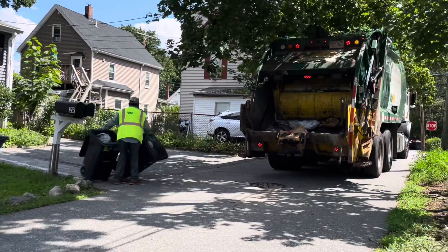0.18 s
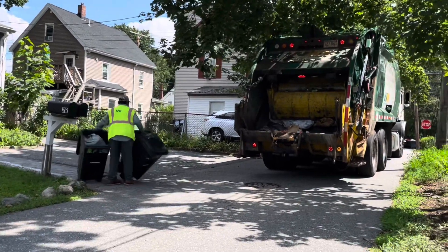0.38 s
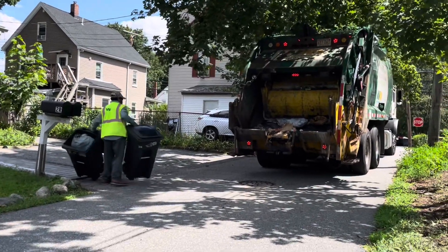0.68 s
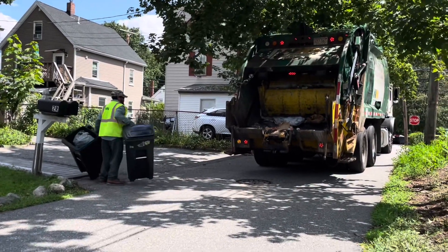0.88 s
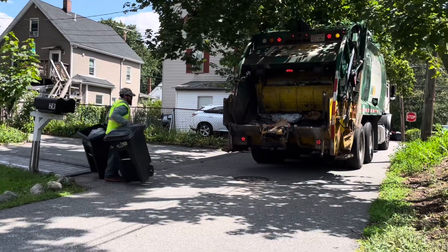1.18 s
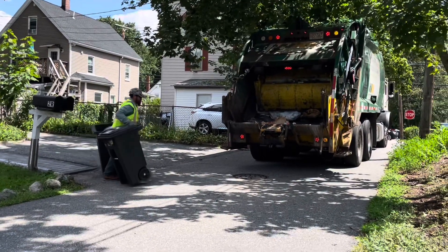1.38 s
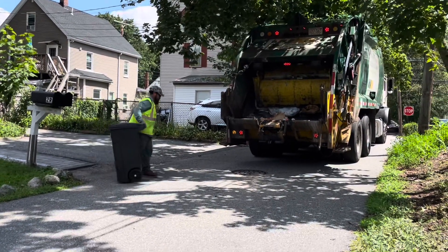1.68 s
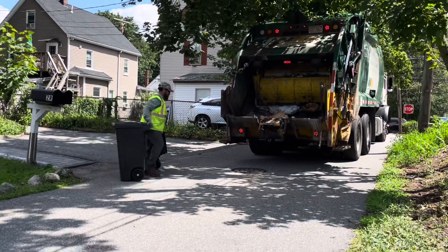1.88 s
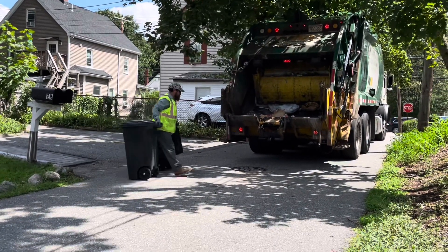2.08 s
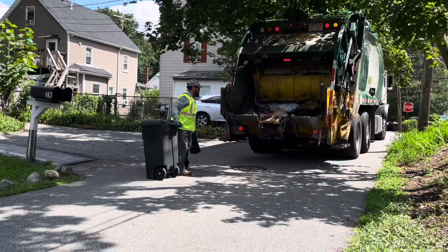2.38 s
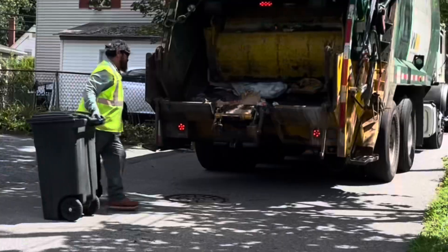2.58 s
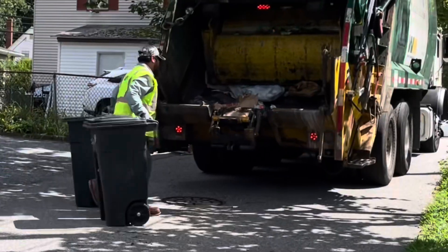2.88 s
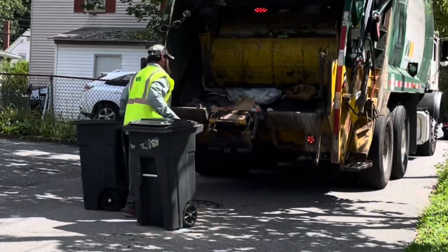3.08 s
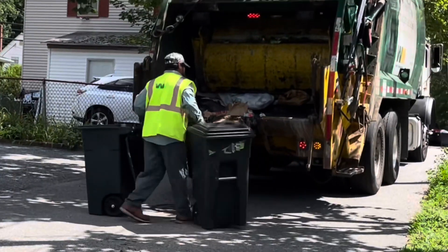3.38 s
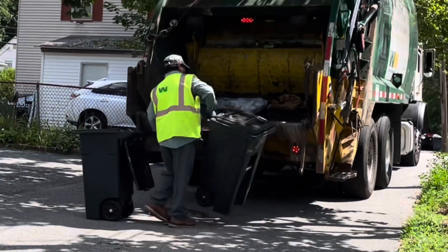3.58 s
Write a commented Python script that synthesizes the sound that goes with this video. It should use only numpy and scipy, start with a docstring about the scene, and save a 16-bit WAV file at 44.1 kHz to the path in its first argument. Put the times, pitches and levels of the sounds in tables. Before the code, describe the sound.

Plastic bins bang with deep boomy thuds, scuff briefly and rumble along the road until about three seconds, ending in sharp clatters; a garbage truck's low diesel drone and faint hydraulic hiss continue throughout, outdoors in stereo.

```python
"""A diesel garbage truck holds a fast idle on a street: summed exhaust orders, pulsing noise, pump tones.
After a lone clack, plastic wheelie bins are bumped and ring in decaying modes; one drags with gritty noise.
Pump hiss and a thin gear whine swell, more bumps boom, and the bins roll on asphalt: random impacts
drive resonances for rumble and lid chatter, while noise bursts clack ever more densely.
The rolling fades after three seconds and the truck idles on; house fronts answer bumps and clacks."""
import sys
import numpy as np
from scipy import signal
from scipy.fft import rfft, irfft, next_fast_len
from scipy.io import wavfile
from scipy.ndimage import map_coordinates

SR = 44100
rng = np.random.default_rng(int(sys.argv[2]) if len(sys.argv) > 2 else 0)


def put_to_file(sound):
    """Save the sound as 16-bit audio at rate SR, in the file named by the first command-line argument."""
    columns = np.atleast_2d(sound).T  # one column per channel
    safe = np.clip(columns, -1, 1)
    whole_steps = np.round(safe * 32767)
    wavfile.write(sys.argv[1], SR, whole_steps.astype(np.int16))


N = 165375


def amp(db):
    """Decibels to gain."""
    return 10 ** (np.asarray(db) / 20)


def unit(x):
    """Scale to rms 1."""
    return x / np.sqrt(np.mean(x ** 2) + 1e-20)


def along(points, hz):
    """Read a curve of (frequency, value) points on a log frequency axis."""
    point_hz, values = np.transpose(points)
    return np.interp(np.log(hz + 1), np.log(point_hz + 1), values)


def curves(rows):
    """One value per sample for each column after the time."""
    times_s, *columns = np.transpose(rows)
    return [np.interp(np.arange(N) / SR, times_s, column) for column in columns]


def wobble(rate):
    """A smooth random curve with rate knots a second."""
    return map_coordinates(rng.standard_normal(1024), [np.arange(N) * rate / SR], mode="mirror")


def filtered(x, response):
    """Shape the spectrum of x by a response of frequency."""
    length = x.shape[-1]
    padded = next_fast_len(length + 8192)
    spectrum = rfft(x, padded) * response(np.fft.rfftfreq(padded, 1 / SR))
    return irfft(spectrum, padded)[..., :length]


# Stereo width, side relative to mid before each layer's offset; columns: frequency_hz, side_db
STEREO_WIDTH = [(60, -23), (250, -10.5), (500, -5), (1000, -3.5), (2000, -2), (4500, -21.5), (7000, -16),
                (10000, -14)]


def coloured(x, spectrum, side_db):
    """Two unrelated signals become mid and side of one stereo sound of rms 1."""
    def response(hz):
        side_gain = amp(along(STEREO_WIDTH, hz) + side_db)
        return amp(along(spectrum, hz)) * np.array([np.ones_like(hz), side_gain])
    mid, side = filtered(x, response)
    return unit(np.array([mid + side, mid - side]))


def resonating(x, peaks):
    """Ring x through parallel band-pass resonances of alternating sign, as stereo of rms 1."""
    def body(hz):
        total = 0
        for k, (centre, width, db) in enumerate(peaks):
            band = 1j * hz * width
            total = total + (-1) ** k * amp(db) * band / (centre * centre - hz * hz + band)
        return total
    return coloured(filtered(x, body), [(25, -23), (80, 7)], side_db=-5.0)


def impacts(rate, spread_db):
    """Two trains of small clicks, rate a second on average, with random sign and strength."""
    hits = rng.random((2, N)) < rate / SR
    signs = rng.choice([-1, 1], (2, N))
    return hits * signs * amp(spread_db * np.clip(rng.standard_normal((2, N)), -2, 2))


def add(track, s, sound):
    """Mix a sound in at time s."""
    part = track[round(s * SR):][:len(sound)]
    part += sound[:len(part)]


# How long the street rings; columns: frequency_hz, t60_s
STREET_DECAY = [(100, 0.84), (500, 0.17), (3000, 0.15), (12000, 0.15)]


def street(x, wet_db):
    """The direct sound plus the scattered answer of truck and houses, as a decaying noise tail."""
    hz, t, cells = signal.stft(rng.standard_normal((2, SR // 2)), SR, nperseg=256)
    decay = amp(-60 * t / along(STREET_DECAY, hz)[:, None])
    onset = 1 - np.exp(-t / 0.0014)
    tail = signal.istft(cells * decay * onset, SR, nperseg=256)[1]
    tail = coloured(tail, [(20, -5), (16000, -2.5)], side_db=4.0)
    tail = tail / np.linalg.norm(tail[0])
    return x + amp(wet_db) * signal.fftconvolve(x[None], tail, axes=1)[:, :N]


# Exhaust orders before the moving offset; columns: multiple_of_firing_rate, level_db
EXHAUST_ORDERS = [(.5, -43), (1, -30.5), (1.5, -39.5), (2, -42), (2.5, -43), (3, -46), (4, -45), (5, -55),
                  (6, -72), (10, -64)]
# Exhaust over time; columns: time_s, offset_db, firing_hz
EXHAUST_COURSE = [(0, -4, 59.6), (.5, -1, 59.3), (.95, -3, 60.23), (1.08, 4, 60.14), (1.25, 2.5, 60.6),
                  (1.45, -7, 60.9), (1.65, 2.5, 62.2), (1.9, -2.5, 62), (3.1, -5.5, 61), (3.75, -1.5, 62.3)]
# Tone of the mechanical noise; columns: frequency_hz, gain_db
ENGINE_TONE = [(20, -26), (35, -1), (60, -3.5), (120, 1.5), (250, -2.5), (400, -8), (660, -18.5),
               (950, -13), (1300, -18.5), (1900, -17.5), (2500, -20), (3300, -23), (6000, -28.5),
               (7300, -33), (10000, -45.5), (13400, -45.5), (14400, -66)]
# Mechanical noise before pulsing; columns: time_s, level_db
ENGINE_COURSE = [(0, -37), (.33, -35.5), (.5, -35), (1.7, -34.5), (2.3, -35), (3.2, -33), (3.75, -34)]
FIRING_DRIFT = .006  # relative scale of the random wander
ORDER_FLUTTER_DB = 1.4  # unsteadiness of each exhaust order
ENGINE_RIPPLE_DB = 1.0  # reflections off truck and road comb the mechanical noise


def engine():
    """Sine exhaust orders, and mechanical noise pulsing at the firing rate and half of it."""
    hum_db, firing_hz = curves(EXHAUST_COURSE)
    phase = 2 * np.pi * np.cumsum(firing_hz * (1 + FIRING_DRIFT * wobble(3.93))) / SR
    hum = np.zeros(N)
    for multiple, db in EXHAUST_ORDERS:
        level = amp(db + hum_db + ORDER_FLUTTER_DB * wobble(11))
        hum += level * np.sqrt(2) * np.sin(multiple * phase + rng.uniform(0, 2 * np.pi))

    level_db, = curves(ENGINE_COURSE)
    pulse_db = 0.63 * np.sin(phase) + 0.44 * np.sin(phase / 2) + 1.0 * wobble(44.69)
    grid_hz = np.linspace(0, SR / 2, 400)
    ripple_db = ENGINE_RIPPLE_DB * rng.standard_normal(len(grid_hz)) * (grid_hz > 500)
    noise = filtered(rng.standard_normal((2, N)), lambda hz: amp(np.interp(hz, grid_hz, ripple_db)))
    return hum + amp(level_db + pulse_db) * coloured(noise, ENGINE_TONE, side_db=-4.5)


# Faint pump tones before wander and flutter; columns: pitch_hz, level_db
PUMP_TONES = [(612, -56), (2425, -55.5)]
# Brief thin whine of gears before flutter; columns: time_s, level_db
GEAR_SWELL = [(.8, -72), (1.05, -56), (1.22, -52), (1.35, -70)]
GEAR_HZ, WHINE_WANDER = 3810, .008  # mean pitch; relative scale of pitch wander


def whines():
    """Sines with randomly wandering pitch: unsteady pump tones and a brief gear whine."""
    def tone(hz):
        return np.sin(2 * np.pi * np.cumsum(hz * (1 + WHINE_WANDER * wobble(90))) / SR)
    gear_db, = curves(GEAR_SWELL)
    pump = sum(amp(db + 2.2 * wobble(8)) * tone(hz) for hz, db in PUMP_TONES)
    return pump + amp(gear_db + 2.5 * wobble(31.5)) * tone(GEAR_HZ)


# Resonances of the hydraulic hiss; columns: centre_hz, width_hz, gain_db
HISS_PEAKS = [(2410, 300, 0.5), (2710, 290, -2.5)]
# Swells of the hiss before flutter; columns: time_s, level_db
HISS_SWELL = [(0, -71), (.6, -64), (.87, -48), (1.15, -63), (1.45, -56), (1.62, -46), (1.7, -55),
              (2.3, -52), (3.75, -50)]


def pump_hiss():
    """Noise through two close resonances: the narrow hydraulic hiss swells and flutters."""
    hiss_db, = curves(HISS_SWELL)
    noise = rng.standard_normal((2, N))
    return amp(hiss_db + 3.0 * wobble(21.7)) * resonating(noise, HISS_PEAKS)


# Rolling wheels before flutter; columns: time_s, rumble_db, grit_db
ROLL_COURSE = [(0, -38, -60), (.95, -44.5, -57), (1.08, -40, -64), (1.3, -29, -55), (1.54, -28.5, -56),
               (1.68, -40, -75), (1.82, -25, -63), (2, -24, -55), (2.08, -27.5, -46.5),
               (2.25, -22.5, -52.5), (2.38, -25, -49), (2.5, -28, -64), (2.63, -21.5, -48),
               (2.82, -23.5, -50.5), (3.0, -20.5, -52), (3.1, -25, -59), (3.2, -35, -75),
               (3.33, -31.5, -62), (3.42, -41.5, -55), (3.75, -38.5, -82)]
# Broad tone of the rolling rush; columns: frequency_hz, gain_db
ROLL_TONE = [(25, -31), (55, -0.5), (85, -3.5), (125, 0.5), (200, -3.5), (320, -3.5), (420, -5), (600, -21),
             (850, -23.5), (1150, -27), (1500, -38), (2100, -32.5), (4000, -54), (9000, -71)]
# Resonances of a rolling bin; columns: centre_hz, width_hz, gain_db
ROLL_PEAKS = [(108.7, 27, 6.5), (156.7, 18, 5), (280, 51, -6.5), (343, 44, -6.5), (523, 33, -9.5),
              (613, 14, -30), (840, 56, -13), (1020, 83, -18.5), (1428, 28, -27)]
# Resonances of small wheel and lid knocks; columns: centre_hz, width_hz, gain_db
JOLT_PEAKS = [(482, 42, -2), (605, 49, -0.5), (766, 126, 0.5), (852, 87, -1), (989, 74, -7.5),
              (1290, 150, -7), (1484, 57, -10), (1750, 41, -12)]
# Tone of grit and scuff; columns: frequency_hz, gain_db
GRIT_TONE = [(500, -13), (2000, 0.5), (5500, 5.5), (8000, -5), (11000, -6), (13500, -10), (14600, -18)]
# A bin drags briefly; columns: time_s, level_db
SCUFF_COURSE = [(.72, -63), (.77, -46), (.83, -47.5), (.92, -63), (1, -85)]
ROLL_RING_DB, ROLL_RUSH_DB, JOLT_DB = -3.5, -3.5, -15  # shares within the rumble


def wheels():
    """Asphalt impacts drum and jolt the hollow bins; denser treble impacts crackle as grit."""
    rumble_db, grit_db = curves(ROLL_COURSE)
    scuff_db, = curves(SCUFF_COURSE)
    ring = resonating(impacts(rate=500, spread_db=3.0), ROLL_PEAKS)
    jolts = resonating(impacts(rate=130, spread_db=3), JOLT_PEAKS)
    rush = coloured(impacts(rate=1500, spread_db=4), ROLL_TONE, side_db=-5.5)
    body = amp(ROLL_RING_DB) * ring + amp(ROLL_RUSH_DB) * rush + amp(JOLT_DB) * jolts
    rumble = amp(rumble_db + wobble(30.12)) * body
    crackle = coloured(impacts(rate=2800, spread_db=2.5), GRIT_TONE, side_db=-18)
    grit = amp(grit_db + 3.3 * wobble(40)) * crackle
    scuff = amp(scuff_db) * coloured(rng.standard_normal((2, N)), GRIT_TONE, side_db=-16)
    return rumble + grit + scuff


# Loose lids on the rolling bins; columns: time_s, level_db
LID_COURSE = [(1.8, -56), (2, -44), (2.15, -48), (2.45, -46), (2.85, -45), (2.97, -38), (3.03, -36.5),
              (3.1, -41), (3.15, -64)]
# Resonances of a lid; columns: centre_hz, width_hz, gain_db
LID_PEAKS = [(832, 35, -2.5), (947, 83, -3.5), (1240, 79, -3.5), (1456, 87, 3.5), (1760, 82, -13.5),
             (2180, 68, -11), (2550, 297, -4)]


def lids():
    """Random impacts ring the loose lids, loudest late in the roll."""
    chatter_db, = curves(LID_COURSE)
    return amp(chatter_db) * resonating(impacts(rate=280, spread_db=2.5), LID_PEAKS)


# The load shifts inside a bin, level before the attack shape; columns: start_s, level_db
LOAD_SHIFTS = [(.362, -27.5), (1.336, -37), (1.366, -38), (3.005, -35)]
# Tone of the grains; columns: frequency_hz, gain_db
CRUNCH_TONE = [(400, -12), (1400, 8), (2000, -2), (3300, 4), (4700, -6), (6000, -23), (10000, -40)]
CRUNCH_RISE_S, CRUNCH_T60_S = .008, 0.15


def crunches():
    """Rubbish settles in a jolted bin as short decaying bursts of dense grains."""
    t, level = np.arange(N) / SR, np.zeros(N)
    for start_s, db in LOAD_SHIFTS:
        rise = 1 - np.exp(-t / CRUNCH_RISE_S)
        add(level, start_s, amp(db - 60 * t / CRUNCH_T60_S) * rise)
    return level * coloured(impacts(rate=900, spread_db=2), CRUNCH_TONE, side_db=4)


# Sharp clacks of lids and axles, level before the shape;
# columns: start_s, level_db, tilt_db_per_octave, rattle_db (relative to the crack)
CLACK_EVENTS = [(0.166, -32, -1, -19), (.358, -36.5, 11, -19), (.389, -32, -5.5, -8),
                (1.342, -24.5, -12.5, -1.5), (2.034, -39, 5, -12), (2.11, -38, 11, -16),
                (2.239, -28.5, 1, -19), (2.384, -41, 5, -11), (2.532, -37, 9, -14), (2.57, -24, 2, -23),
                (2.612, -39, 2, -20), (2.684, -27, 5, -12), (2.691, -9, 2.5, -21), (2.84, -25.5, 0, -18.5),
                (2.862, -19, 1.5, -20.5), (2.9, -31, 0.5, -7), (2.927, -28, 10, -20), (2.951, -26, 4, -16),
                (2.961, -16.5, -1.5, -18), (2.985, -26, -5, -7), (3.002, -19, 9.5, -18.5),
                (3.012, -17.5, -3.5, -19), (3.069, -22, 6, -17), (3.077, -23.5, 0, -17),
                (3.094, -18.5, -0.5, -21.5), (3.263, -24, 4, -13), (3.272, -16, -0.5, -13),
                (3.283, -34, 2, -14), (3.299, -15, 4.5, -20.5), (3.469, -27, 1.5, -10.5)]
# Shared tone of the clacks; columns: frequency_hz, gain_db
CLACK_TONE = [(200, -29), (600, 0.5), (1400, 3), (2000, 0), (2800, 3), (4000, 2), (6300, 1), (8000, -4.5),
              (10500, -12.5), (13000, -14), (15500, -26)]
CLACK_RISE_S, CLACK_T60_S, RATTLE_T60_S = .001, .02, 0.3
CLACK_RIPPLE_DB = 2.5  # depth of each clack's own resonances


def clacks():
    """Hard plastic slaps: noise with a short crack and a weak, longer rattle, each coloured anew."""
    out, t = np.zeros(N), np.arange(SR // 3) / SR
    grid_hz = np.linspace(0, SR / 2, 128)
    rise = 1 - np.exp(-(t / CLACK_RISE_S) ** 2)
    for start_s, db, tilt, rattle_db in CLACK_EVENTS:
        shape = (amp(-60 * t / CLACK_T60_S) + amp(rattle_db - 60 * t / RATTLE_T60_S)) * rise
        ripple_db = CLACK_RIPPLE_DB * rng.standard_normal(len(grid_hz))

        def response(hz):
            tilt_db = tilt * np.log2(np.maximum(hz, 800) / 4000)  # pivots at 4 kHz
            return amp(along(CLACK_TONE, hz) + np.interp(hz, grid_hz, ripple_db) + tilt_db)
        noise = filtered(rng.standard_normal(len(t)), response)
        add(out, start_s, amp(db) * shape * unit(noise))
    return out


# Bumps of the bins, scaling the modes below;
# columns: start_s, cavity_db, wall_db, rim_db, panel_db, pitch_ratio, length_ratio
BUMP_EVENTS = [(.358, -28, -13, -17.5, -29.5, 1.03, 1), (.367, -7, -11, -18.5, -37, 1.22, 0.88),
               (.383, -9, -15, -25, -42, 1.06, 0.85), (0.391, -5, -38, -25, -40, 0.96, 0.87),
               (0.443, -14, -30.5, -35, -39, 0.9, 1.5), (1.116, -35, -17.5, -33, -50, 0.96, 0.62),
               (1.213, -8.5, -19, -24, -42, 1.1, 0.7), (1.222, -9.5, -22, -23.5, -35, 1.29, 0.83),
               (1.256, -13, -26, -25.5, -44, 1.07, 0.43), (1.296, -17, -27, -43, -44, 1.13, 1.4),
               (1.343, -3.5, -2.5, -14, -26, 0.95, 0.42), (1.369, -19, -13, -21.5, -30, 1.06, 0.71),
               (1.411, -15, -29, -33, -42, 0.63, .8), (1.471, -45, -19.5, -29.5, -36, 1.04, 1.14),
               (1.759, -43, -32, -10, -58, 0.97, 0.8), (1.763, -10, -21, -48, -55, 1.85, 0.6),
               (1.782, -19.5, -23.5, -26, -39, 1.15, 0.74), (1.958, -21, -9, -17.5, -28, 0.77, 0.65),
               (2.204, -13, -14, -24, -42, 0.96, 0.41), (2.305, -11, -25, -33, -45, 1.1, 0.91),
               (2.59, -39, -17.5, -16.5, -44, 0.98, 0.65), (2.66, -29, -19, -18, -45, 0.88, 0.86),
               (2.721, -14, -33, -14, -45, 0.86, 0.79), (2.775, -13, -32, -29, -43, 1.01, 1.3),
               (2.796, -47, -28, -19, -42, 0.875, 0.72), (2.847, -21, -28, -19.5, -38, 0.91, 0.8),
               (2.897, -31, -17, -15, -25, 1.08, 0.78), (2.918, -21, -17.5, -15, -36, 0.9, 0.98),
               (3.013, -19, -25, -15.5, -20, 1.24, 0.74), (3.027, -17, -18.5, -40, -35, 0.75, 1.3),
               (3.087, -14, -17, -31, -30, 1.15, 0.9), (3.102, -30, -15, -17, -34, 1.05, 0.46),
               (3.118, -9.5, -28.5, -45, -44, 0.97, 2.2), (3.272, -41, -17, -18, -19, 1.03, 0.64),
               (3.299, -25, -24, -17.5, -21, 1.08, 0.78), (3.325, -19, -31, -47, -50, 1.17, 1.16),
               (3.469, -36, -36, -21, -41, 1.12, 1.06)]
# Modes before each bump's scaling; columns of all four: pitch_hz, level_db, t60_s
# Boom of the enclosed air
CAVITY_MODES = [(92.8, -8.5, 0.18), (110.7, -2, 0.11), (148, -11, 0.068)]
# Bin walls
WALL_MODES = [(240, -8.5, 0.19), (323.7, 2, 0.091), (377.2, -1.5, 0.11), (477, -9.5, 0.13),
              (581, -8, 0.032)]
# Knock of the rim
RIM_MODES = [(786, -3.5, 0.053), (864, 2, 0.043), (961, -1, 0.034)]
# Clatter of the panels
PANEL_MODES = [(1076, 5, 0.03), (1250, -14, 0.045), (1368, -6, 0.12), (1450, -3.5, 0.049),
               (1694, -27, 0.022), (1960, 0, 0.036), (2210, -1, .03), (2460, -1, 0.034)]


def bumps():
    """Every bump rings the air cavity, walls, rim and panels of a bin as decaying sines."""
    out, t = np.zeros(N), np.arange(SR // 2) / SR

    def ring(modes, pitch, length, attack_s):
        total = np.zeros(len(t))
        for hz, db, t60 in modes:
            level = amp(db + rng.normal(0, 1) - 60 * t / (t60 * length))
            mode_hz = hz * pitch * (1 + rng.normal(0, 0.017))
            total += level * np.sin(2 * np.pi * mode_hz * t)
        return total * (1 - np.exp(-(t / attack_s) ** 2))

    for start_s, cavity_db, wall_db, rim_db, panel_db, pitch, length in BUMP_EVENTS:
        cavity = amp(cavity_db) * ring(CAVITY_MODES, pitch, length, attack_s=0.0016)
        walls = amp(wall_db) * ring(WALL_MODES, pitch, length, attack_s=0.0024)
        rim = amp(rim_db) * ring(RIM_MODES, pitch, length, attack_s=0.0025)
        panels = amp(panel_db) * ring(PANEL_MODES, pitch, length, attack_s=0.0032)
        add(out, start_s, cavity + walls + rim + panels)
    return out


def scene():
    """Truck and bins together; the street answers the bumps and clacks."""
    truck = engine() + whines() + pump_hiss()
    rolling = wheels() + lids() + crunches()
    return truck + rolling + street(clacks(), wet_db=-7.5) + street(bumps(), wet_db=-11)


# Level between the ports; columns: frequency_hz, left_minus_right_db
PORT_LEVELS = [(60, 0.7), (110, 0.1), (200, -1), (380, 0), (700, 2), (1290, 2.5), (2380, 2), (4400, -0.5),
               (8120, 0.5), (15000, -0.5)]
# Phase between the ports; columns: frequency_hz, left_lead_rad
PORT_LEAD = [(100, 0), (400, 0), (1100, .25), (1400, -.3), (2900, .25), (3500, 0), (6100, 0), (6800, -.9),
             (7700, -2.8), (8900, -3.4), (10400, -5.9), (12800, -6.9), (13900, -9.2)]
# Microphone treble, with a narrow notch and a peak above it; columns: frequency_hz, gain_db
MIC_TREBLE = [(7300, -0.5), (7750, 3), (8000, -11), (8600, -4), (8900, 10.5), (9300, 1), (13500, -1.5),
              (14300, 3)]
LOW_CUT_HZ, TOP_HZ = 32, 15800  # corner of the low cut; band limit


def record(dry):
    """Two microphone ports differ in phase and level; low cut, uneven treble and band limit follow."""
    sides = np.array([[.5], [-.5]])  # half of each difference goes to each port

    def response(hz):
        ports = amp(sides * along(PORT_LEVELS, hz)) * np.exp(1j * sides * along(PORT_LEAD, hz))
        low_cut = hz ** 2 / np.hypot(hz ** 2, LOW_CUT_HZ ** 2)
        return ports * low_cut * amp(along(MIC_TREBLE, hz)) * (hz < TOP_HZ)
    return filtered(dry, response)


dry = scene()
out = record(dry)
put_to_file(out)
```